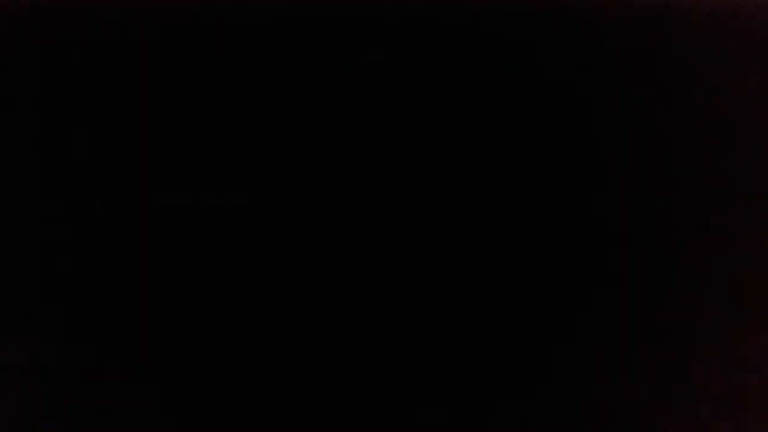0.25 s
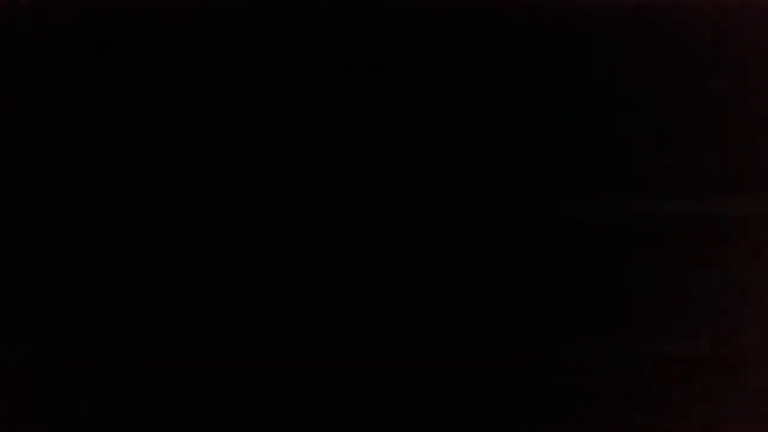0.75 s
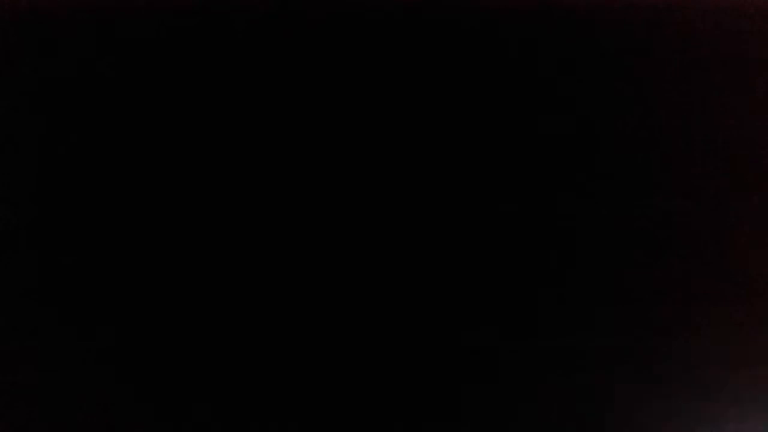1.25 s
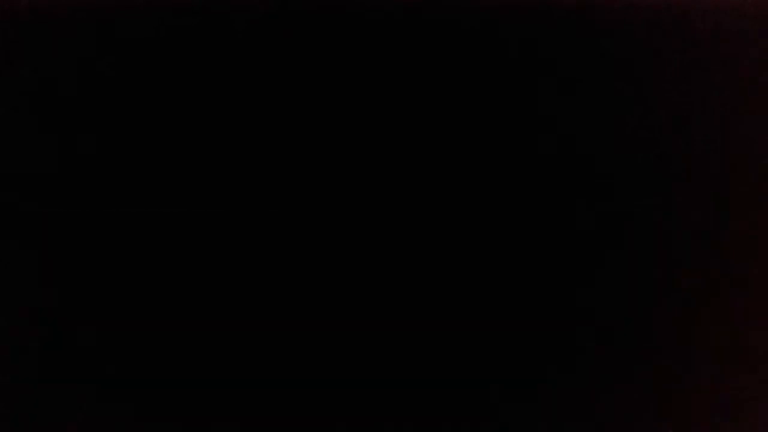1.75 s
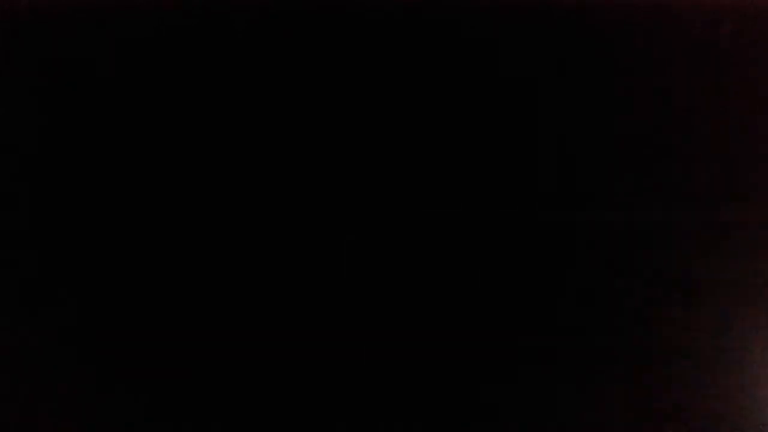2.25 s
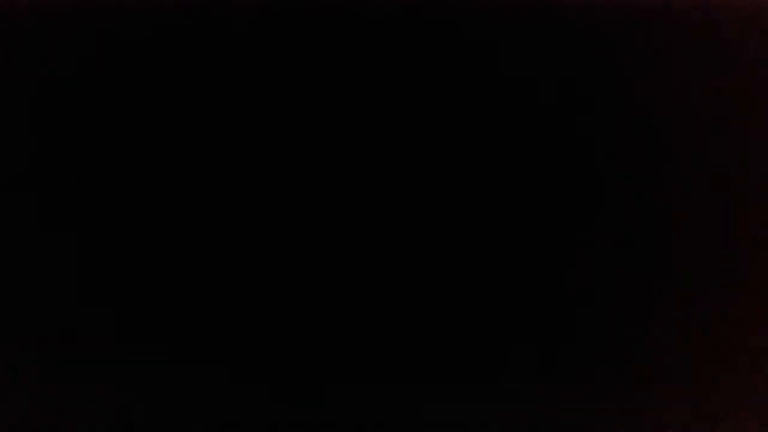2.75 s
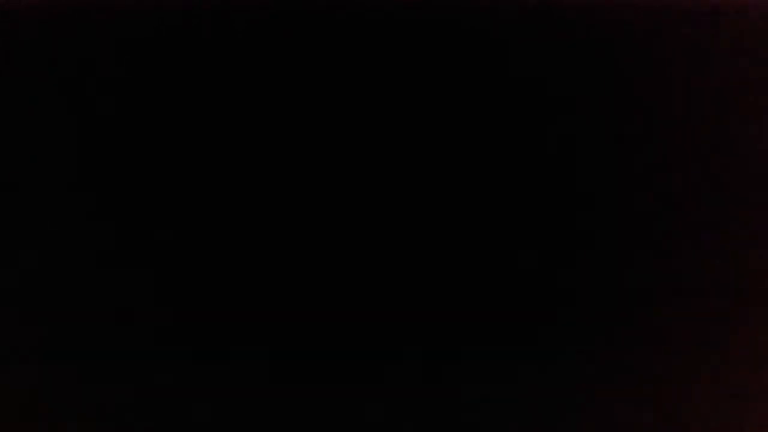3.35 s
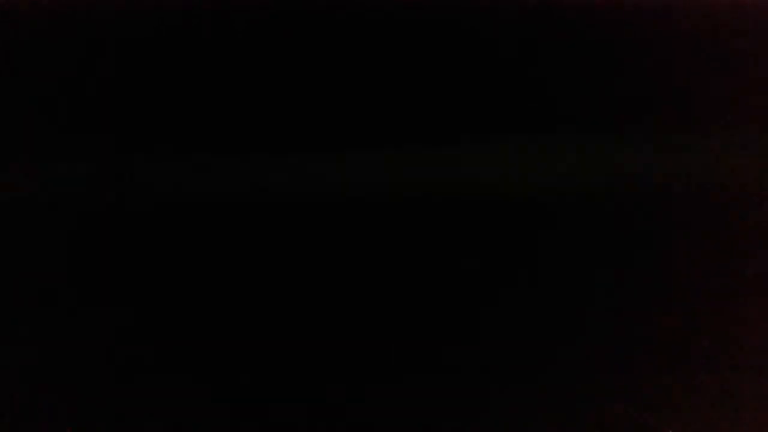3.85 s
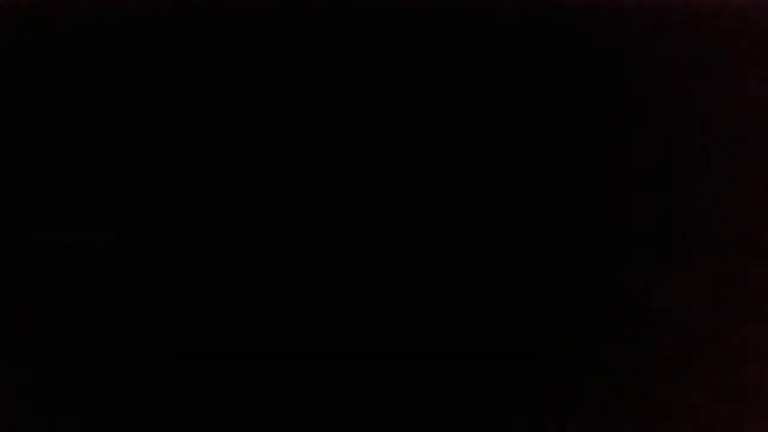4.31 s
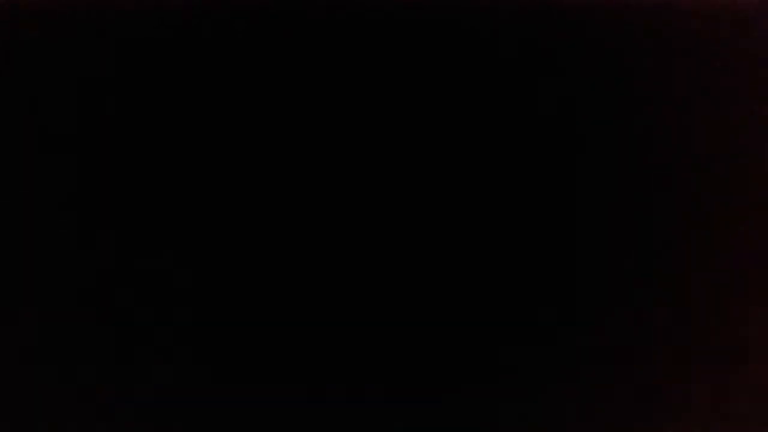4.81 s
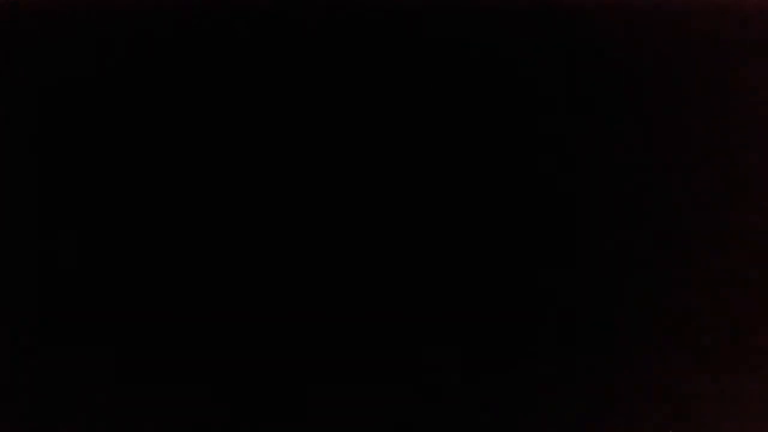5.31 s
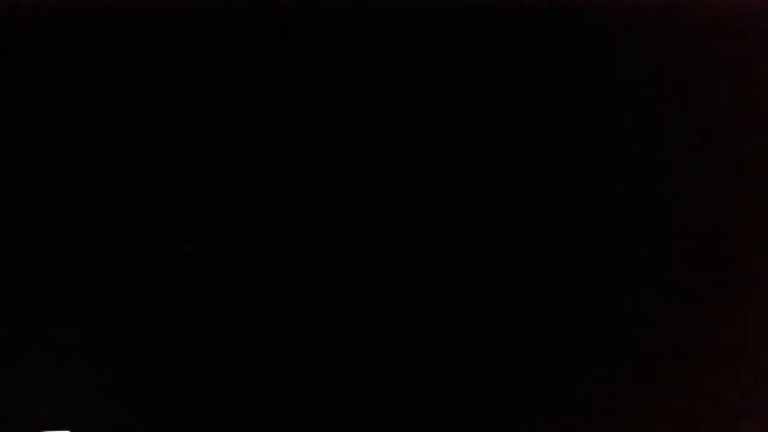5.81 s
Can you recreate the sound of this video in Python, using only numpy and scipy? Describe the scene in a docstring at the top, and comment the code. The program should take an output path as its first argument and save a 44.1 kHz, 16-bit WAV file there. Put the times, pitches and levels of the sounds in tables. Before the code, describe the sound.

Inside a fast electric train in a tunnel, heavy wheel rumble and roar fill the car while a loose fitting squeaks and trim ticks.

```python
"""Inside the car of an electric train running fast through a tunnel, the microphone among hard walls.
From the start wheels on rail fill the car with boom, rumble and roar: noise bands that swell apart.
Soon a loose fitting squeaks in quick bursts as the car shakes: short sagging tones, clicks, scrapes.
Trim ticks now and then as puffs of noise, and the walls throw both back as echoes and a tail.
Later come brief, faint high partials with puffs of noise, and low hums, unsteady tones, that swell."""
import sys
import numpy as np
from scipy import signal
from scipy.fft import rfft, irfft, next_fast_len
from scipy.io import wavfile
from scipy.ndimage import uniform_filter1d

SR = 44100
rng = np.random.default_rng(int(sys.argv[2]) if len(sys.argv) > 2 else 0)


def store_wav(level_fs):
    """Save 16-bit WAV to argv[1]."""
    pcm = np.round(np.clip(np.atleast_2d(level_fs), -1, 1) * 32767)
    wavfile.write(sys.argv[1], SR, pcm.T.astype(np.int16))


N = 267687

# borders between neighbouring parts of the rolling noise: crossover_hz
CROSSOVERS_HZ = [105, 145, 240, 600, 1000, 2400, 3700]
# spectral slope of the rolling noise inside its parts: frequency_hz, level_db (per Hz)
ROLLING_COLOUR = [(15, -20), (36, -18), (58, -1), (80, -3), (108, -12), (230, -7), (850, -13), (1020, -18),
                  (2150, -24), (2550, -32), (6150, -36), (8000, -46), (8800, -57), (9800, -85)]
# air and panel resonances of the car: centre_hz, width_hz, peak_db (over the colour)
CAR_RESONANCES = [(69, 14, 4), (129, 12, 3.5), (160, 16, 4), (188, 18, 3), (212, 10, 3), (325, 45, 4),
                  (410, 20, 3), (480, 16, 3), (870, 90, 3), (1700, 240, 5), (2850, 60, 5)]
# parts of the rolling noise from boom, low and high rumble, low and high roar, rail singing, rattle
# to air hiss: start_level_db, drift_db_per_s, waver_db (rms), boom_share, roar_share (of the swells)
ROLLING_PARTS = [(-20, 0, 0.04, 0.72, 0.65), (-27, 0.55, -2, 0.11, -1.1), (-20.5, -0.74, 0.7, -0.17, 1),
                 (-19, -0.2452, 0.1, 0.016, 0.48), (-20, -1.48, -0.1, -0.24, 0.96),
                 (-22, -0.16, 0.1, -0.1, 0.6), (-38, -0.09, 1, -0.08, 0.75),
                 (-36, -0.34, 1.8, -0.046, 0.51)]
# slow random drift, lowest and highest rate: rate_hz
WAVER_HZ = (.6, 8)
# swell of the boom: time_s, level_db
BOOM_SWELL = [(0, -13), (.15, 1.5), (.55, 5.5), (0.76, 4.5), (1.22, 6.5), (1.65, -4), (2.15, 5.5),
              (2.45, -5.5), (2.75, -3.5), (3.08, -2.5), (3.5, -4), (3.85, 2.5), (4.2, -9.5), (4.5, -7),
              (4.72, 0), (4.9, -5), (5.2, 0.5), (5.6, -6.5), (6.07, -4)]
# swell of the roar: time_s, level_db
ROAR_SWELL = [(0, -2.5), (.35, 1), (.8, -1), (1.25, 3), (1.6, -0.5), (2.05, 2), (2.3, 1.5), (2.85, 0.5),
              (3.15, 1), (3.5, 0.3), (3.852, 0), (4.2, -1.5), (4.5, -1.5), (4.9, 0.5), (5.1, -0.5),
              (5.7, 1.5), (6.07, 2.5)]
# slips of the loose fitting, levels before the echoes:
# start_s, level_db, pitch_hz, overtone_db, scrape_db (last two relative to level_db)
SQUEAKS = [(0.2626, -34, 4650, -37, -12), (0.311, -21.5, 4220, -15, -12), (0.4385, -19.5, 4770, -14, -15),
           (0.4854, -19.5, 4570, -13, -8), (0.546, -18.5, 4640, -12, -12), (0.599, -14, 4550, -15.5, -9),
           (0.6953, -31, 4560, -19, -7), (1.297, -10.5, 4410, -15, -8), (1.35, -9.5, 4370, -14, -8),
           (1.4073, -11, 4510, -17, -10.5), (1.458, -30, 4470, -11, -8), (2.443, -31, 4640, -8, -1),
           (2.835, -13, 4500, -15, -11), (2.8922, -15, 4450, -27, -9), (2.9454, -14.5, 4440, -14, -17),
           (3.5502, -29, 4500, -14, -9), (3.7028, -21.5, 4370, -14, -6), (3.76, -29, 4230, -23, -3),
           (3.8152, -20, 4760, -15, -15), (4.4737, -27.5, 4660, -13, -9), (4.588, -16, 4650, -13.5, -13),
           (4.646, -28, 4560, -14, -9), (4.6927, -21, 4400, -13.5, -11), (4.746, -27, 4550, -25, -12),
           (4.754, -26, 4650, -28, -6), (5.863, -27.5, 4650, -25, -4)]
# clicks of the trim, and one faint high hiss:
# start_s, peak_db (before the echoes), centre_hz, half_width_hz, decay_s
TICKS = [(0.438, -21, 5340, 900, 0.0022), (0.505, -25, 2770, 450, 0.013), (0.59, -23, 5500, 2000, 0.0023),
         (0.78, -16, 4300, 2000, .002), (1.265, -14.5, 5070, 2640, 0.0099),
         (2.225, -10.5, 5350, 1960, 0.00089), (2.2255, -20, 4900, 600, .003),
         (2.277, -18.5, 4930, 1990, 0.0042), (2.383, -22, 4330, 2010, .004),
         (2.501, -29.5, 6100, 600, .004), (2.8912, -10, 5900, 1300, 0.0003), (3.096, -22, 6060, 600, 0.006),
         (3.108, -27, 3300, 500, .006), (3.17, -41, 8570, 500, 0.056), (5.409, -27, 2870, 302, 0.005),
         (5.479, -16, 5540, 1940, 0.002)]
# paths by walls, window and ceiling: delay_s, level_db, treble_level_db
ECHOES = [(0, 0, -4), (.0027, -13, -6), (.0067, 1, -5), (.0078, -14, 0), (.0088, -9, -1), (.011, -8, -5),
          (.0123, -7, -8), (.0172, -7, -4), (.0185, -12, -2), (.0205, -14, -5), (.0265, -12, -9),
          (.03, -12, -9)]
# brief high partials: start_s, level_db (before the echoes), pitch_hz
SNAPS = [(1.298, -36, 13500), (1.4085, -37, 13600), (2.221, -40, 13300), (2.836, -47, 13300),
         (4.589, -51, 13900)]
# low hums: middle_s, level_db (rms at the top of the swell), pitch_hz, half_length_s
HUMS = [(2.07, -18.5, 159.8, 0.17), (2.7, -21.5, 164.3, 0.24), (3.78, -17.5, 128.5, 0.26),
        (4.38, -19.5, 160.4, 0.11), (4.48, -20.5, 183, .12), (4.6, -16.5, 168.1, .17),
        (4.719, -22, 124.4, 0.19), (5.14, -15.5, 158.8, 0.19), (5.46, -21, 151.9, .2)]

SCRAPE_HZ, SCRAPE_HALF_WIDTH_HZ, SCRAPE_DECAY_S = 5020, 2870, 0.021
DULL_HZ, EDGE_HZ = 10449, 14960  # low-pass edges: of the squeaks and ticks, and of the whole mix


def gain_of(db):
    """Decibels to amplitude."""
    return 10 ** (np.asarray(db) / 20)


def evened(x):
    """Scales to rms 1."""
    return x / np.sqrt(np.mean(x ** 2) + 1e-20)


def add(mix, start_s, sound):
    """Mixes a sound in at start_s."""
    part = mix[round(start_s * SR):][:len(sound)]
    part += sound[:len(part)]


def low_pass(edge_hz):
    """Taps of a steep filter that passes what lies below edge_hz."""
    return signal.firwin(511, edge_hz, window=("kaiser", 9), fs=SR)


def high_pass(edge_hz):
    """Taps of a gentle filter that passes what lies above edge_hz."""
    return signal.firwin(63, edge_hz, pass_zero=False, fs=SR)


def waver(t):
    """A slow random drift of rms 1: sines of random phase, weaker the faster they are."""
    rates_hz = np.geomspace(*WAVER_HZ, 16)
    return evened(sum(np.sin(2 * np.pi * (hz * t + rng.random())) / np.sqrt(hz) for hz in rates_hz))


def rolling_levels():
    """Level of each part in dB: a steady drift, slow wavering and its shares of the two swells."""
    t = np.arange(0, N + 256, 256) / SR
    boom = np.interp(t, *np.transpose(BOOM_SWELL))
    roar = np.interp(t, *np.transpose(ROAR_SWELL))
    levels_db = []
    for start_db, drift, waver_db, boom_share, roar_share in ROLLING_PARTS:
        swell_db = boom_share * boom + roar_share * roar
        levels_db.append(start_db + drift * t + waver_db * waver(t) + swell_db)
    return t, levels_db


def rolling():
    """Rough wheels on rough rail: noise through the car's resonances, each part swelling its own way."""
    size = next_fast_len(N)
    hz = np.fft.rfftfreq(size, 1 / SR)
    colour_hz, colour_db = np.transpose(ROLLING_COLOUR)
    slope_db = np.interp(np.log(hz + 1), np.log(colour_hz + 1), colour_db, right=-140)
    spectrum = rfft(rng.standard_normal(size)) * gain_of(slope_db)
    for centre_hz, width_hz, peak_db in CAR_RESONANCES:
        spectrum = spectrum * gain_of(peak_db / (1 + (2 * (hz - centre_hz) / width_hz) ** 2))
    # share of each frequency below each crossover; neighbouring parts overlap smoothly
    below = [0 * hz] + [1 / (1 + (hz / edge) ** 12) for edge in CROSSOVERS_HZ] + [0 * hz + 1]
    level_t, levels_db = rolling_levels()
    t, out = np.arange(N) / SR, np.zeros(N)
    for share, level_db in zip(np.diff(below, axis=0), levels_db):
        part = evened(irfft(spectrum * share, size)[:N])
        out += part * gain_of(np.interp(t, level_t, level_db))
    return out


def patchy(x, depth_db=1.1):
    """Drifting patches a few hundred Hz wide and a tenth of a second long, louder and softer."""
    spectra = signal.stft(x, nperseg=1024, noverlap=768)[2]
    patches = rng.standard_normal(spectra.shape)
    patches = uniform_filter1d(patches, size=9, axis=0)  # smooth over frequency
    patches = uniform_filter1d(patches, size=20, axis=1)  # smooth over time
    return signal.istft(spectra * gain_of(depth_db * evened(patches)), nperseg=1024, noverlap=768)[1][:N]


def puff(hz, half_width_hz, decay_s):
    """A click with a gritty, decaying tail of random signs, band-passed around hz to peak 1."""
    t = np.arange(4096) / SR
    burst = rng.choice([-1., 1.], len(t)) * np.exp(-t / decay_s)
    burst[0] = 6  # the click
    edges_hz = [max(hz - half_width_hz, 200), hz + half_width_hz]
    band = signal.butter(6, edges_hz, "bandpass", fs=SR, output="sos")
    sound = signal.sosfilt(band, burst)
    return sound / abs(sound).max()


def squeaks(length_s=0.003, sag=0.04, ring_db=-34, ring_s=0.006, click_db=3):
    """Each slip of the fitting sings briefly over a click and a dry scrape, then rings on faintly."""
    out, t = np.zeros(N), np.arange(2048) / SR
    along = np.clip(t / length_s, 0, 1)
    ring = gain_of(ring_db) * along * np.exp(-t / ring_s)
    swell = np.sin(np.pi * along) ** 2 + ring
    for start_s, db, hz, overtone_db, scrape_db in SQUEAKS:
        # the pitch sags as the slip slows
        phase = 2 * np.pi * np.cumsum(hz * (1 + sag * (.5 - along))) / SR
        tone = np.sin(phase) + gain_of(overtone_db) * np.sin(2 * phase)
        scrape = puff(SCRAPE_HZ, SCRAPE_HALF_WIDTH_HZ, SCRAPE_DECAY_S)
        click = puff(6000, 1300, 0.00055)
        add(out, start_s, gain_of(db) * swell * tone)
        add(out, start_s, gain_of(db + scrape_db) * scrape)
        add(out, start_s, gain_of(db + scrape_db + click_db) * click)
    return out


def ticks():
    """Trim panels click against each other, and one faint high hiss: puffs of band-passed noise."""
    out = np.zeros(N)
    for start_s, db, hz, half_width_hz, decay_s in TICKS:
        add(out, start_s, gain_of(db) * puff(hz, half_width_hz, max(decay_s, .0003)))
    return out


def wall_echoes(low_x, treble):
    """A few strong returns from the surfaces, with levels of their own in the treble."""
    low_taps, treble_taps = np.zeros((2, SR // 10))
    for delay_s, db, treble_db in ECHOES:
        low_taps[round(delay_s * SR)] += gain_of(db)
        treble_taps[round(delay_s * SR)] += gain_of(treble_db)
    return (signal.oaconvolve(low_x, low_taps) + signal.oaconvolve(treble, treble_taps))[:N]


def sparse_tail(t60_s, build_up_s=.014, spacing=20):
    """Sparse taps of random sign, about one per spacing samples, that build up and die away."""
    at = np.arange(0, SR // 2, spacing)
    at = at + rng.integers(0, spacing, len(at))
    tap_s = at / SR
    tail = np.zeros(SR // 2 + spacing)
    decay = gain_of(-60 * tap_s / t60_s)
    tail[at] = rng.choice([-1., 1.], len(at)) * decay * np.clip(tap_s / build_up_s, 0, 1) ** 2
    return tail / np.linalg.norm(tail)


def car(x, tail_db=-4, t60_s=.28, treble_hz=7800, shift_hz=6.3,
        treble_tail_db=5, upper_hz=5500, upper_db=-7):
    """Hard walls return echoes; a changing mix of three random tails keeps the reverberation varied."""
    treble = signal.oaconvolve(x, high_pass(treble_hz), "same")
    upper = signal.oaconvolve(x - treble, high_pass(upper_hz), "same")
    # the surfaces return less between upper_hz and the treble: this share skips the echoes
    unreturned = (1 - gain_of(upper_db)) * upper
    out = unreturned + wall_echoes(x - treble - unreturned, treble)
    into_tails = x + (gain_of(treble_tail_db) - 1) * treble
    for k in range(3):
        tail = sparse_tail(t60_s) * gain_of(tail_db)
        # the three shares keep a constant total power
        share = np.sqrt(2 / 3) * np.cos(2 * np.pi * (shift_hz * np.arange(N) / SR + k / 3))
        out += signal.oaconvolve(into_tails * share, tail)[:N]
    return out


def snaps(length_s=0.0025, air_db=-2, latest_s=.012):
    """A brief high partial and a puff of noise near 11 kHz, repeated at the early echo delays."""
    out, t = np.zeros(N), np.arange(0, length_s, 1 / SR)
    for start_s, db, hz in SNAPS:
        partial = np.sin(np.pi * t / length_s) ** 2 * np.sin(2 * np.pi * hz * t)
        air = gain_of(air_db) * puff(11300, 800, .002)
        for delay_s, _, treble_db in ECHOES:
            if 0 < delay_s < latest_s:
                add(out, start_s + delay_s, gain_of(db + treble_db) * partial)
                add(out, start_s + delay_s, gain_of(db + treble_db) * air)
    return out


def hums(wobble=0.021):
    """Each low hum is a slightly unsteady tone under a smooth swell; wobble is its rms share of pitch."""
    out = np.zeros(N)
    for middle_s, db, hz, half_s in HUMS:
        t = np.arange(0, 2 * half_s, 1 / SR)
        phase = 2 * np.pi * (np.cumsum(hz * (1 + wobble * waver(t))) / SR + rng.random())
        swell = np.sin(np.pi * t / (2 * half_s)) ** 2
        add(out, middle_s - half_s, np.sqrt(2) * gain_of(db) * swell * np.sin(phase))
    return out


def scene():
    """Rolling noise and hums plus the small sounds in the car, squeaks and ticks low-passed at DULL_HZ."""
    train = patchy(rolling())
    fittings = signal.oaconvolve(car(squeaks() + ticks()), low_pass(DULL_HZ), "same")
    return (train + fittings + snaps() + hums())[None]


def record(dry):
    """The input stage rounds the tallest peaks, adding little brightness; then a low-pass at EDGE_HZ."""
    rounding = 1.3 * np.tanh(dry / 1.3) - dry
    soft = dry + signal.oaconvolve(rounding, low_pass(8500)[None], "same")
    return signal.oaconvolve(soft, low_pass(EDGE_HZ)[None], "same")


dry = scene()
out = record(dry)
store_wav(out)
```